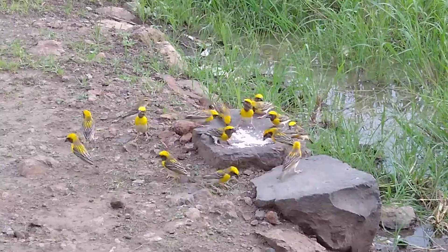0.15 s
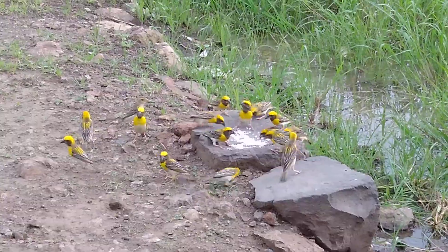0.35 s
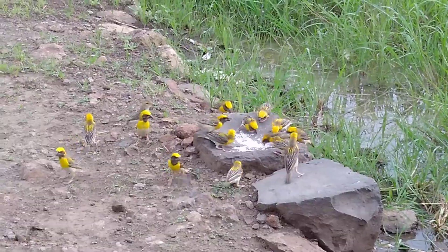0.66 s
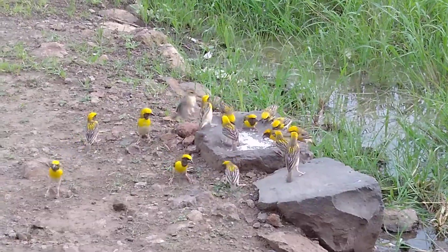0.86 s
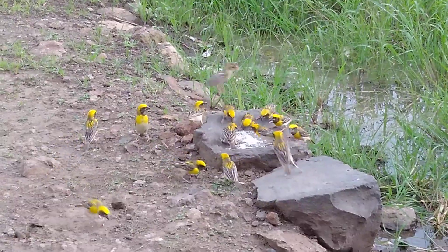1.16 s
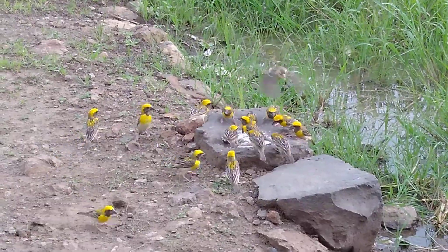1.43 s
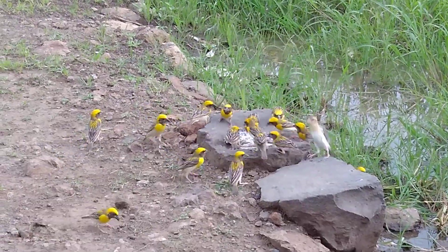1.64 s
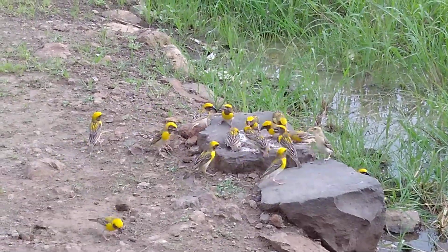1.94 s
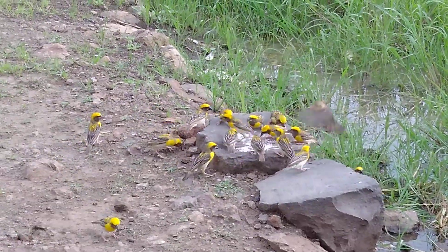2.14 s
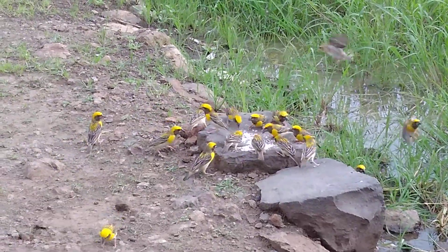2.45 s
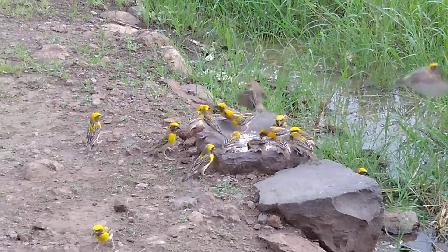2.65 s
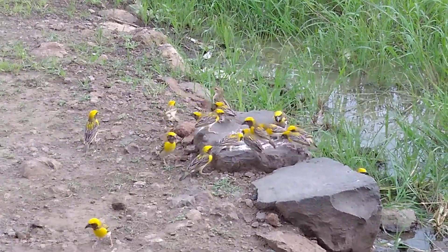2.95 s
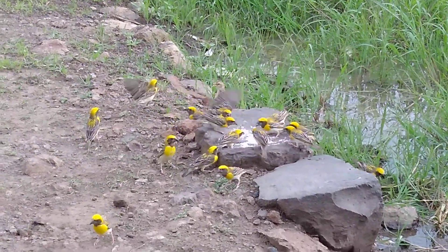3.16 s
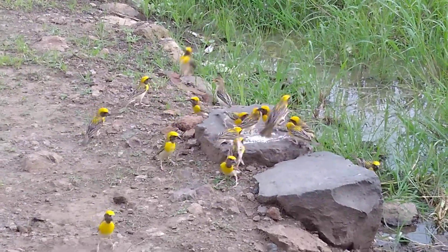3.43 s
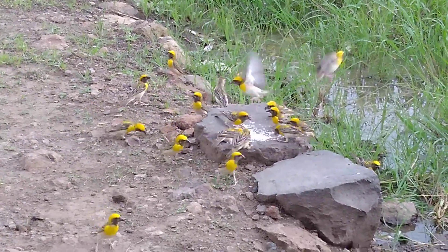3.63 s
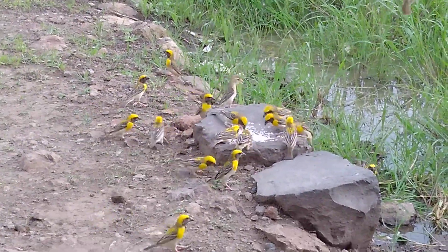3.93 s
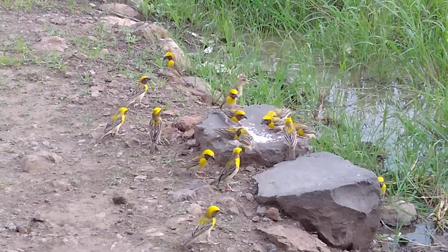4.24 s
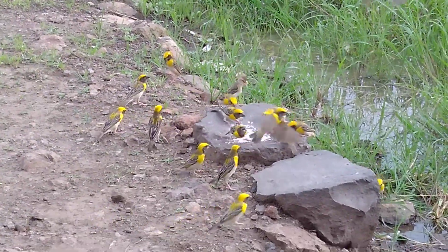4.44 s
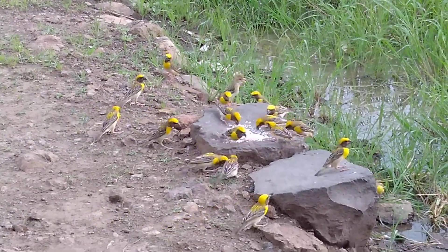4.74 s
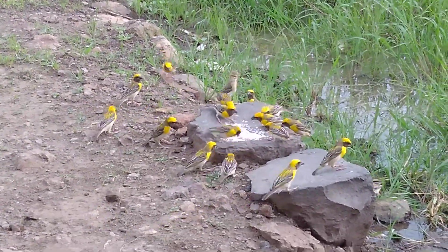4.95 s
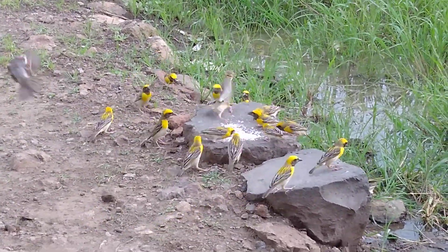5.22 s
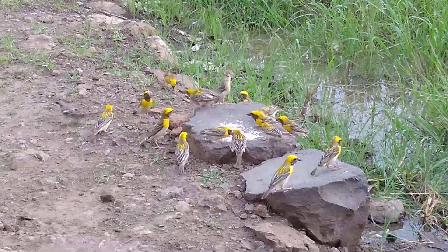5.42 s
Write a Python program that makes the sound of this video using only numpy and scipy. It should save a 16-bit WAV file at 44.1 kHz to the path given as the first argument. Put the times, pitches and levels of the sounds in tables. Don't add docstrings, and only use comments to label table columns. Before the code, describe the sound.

Outdoor flock chatter, close and bright: rapid chirps with a sharp downward opening and a rough, nasal tail, overlapped by small sliding whistles. It starts busy, breaks into short pauses, crowds in the middle, drops to a near lull around five seconds with a faint distant trill, and resumes. Tiny seed cracks tick. Short rocky reflections, low traffic rumble, very faint hum and coos; phone stereo leaning right.

```python
import sys
import numpy as np
from scipy import signal
from scipy.fft import rfft, irfft
from scipy.io import wavfile
from scipy.ndimage import uniform_filter1d

SR = 44100
rng = np.random.default_rng(int(sys.argv[2]) if len(sys.argv) > 2 else 0)


def boost(x):
    u = np.asarray(x, float) / 20
    return 10 ** u


def store_pcm(level_fs):
    pcm = np.round(np.clip(level_fs, -1, 1) * 32767).astype(np.int16)
    wavfile.write(sys.argv[1], SR, np.atleast_2d(pcm).T)


N = 246078
HZ = np.arange(N // 2 + 1) * SR / N

# t/s as the upper voice falls past 4.7 kHz, peak level/dB, held
# voice/dB, sum tone/dB
LAZY_SLIDES = [(0.8724, -31, -30, -4.5), (2.3847, -36, -36, -12), (2.5611, -32.5, -10.5, -12.5),
               (3.2063, -27, -18, -13), (3.3737, -29, -5, -10.5), (3.7907, -25, -8.5, -14),
               (4.8097, -34.5, -1.5, -36.5), (5.3798, -35.5, -7.5, -3), (5.5564, -35, -8, -5.5)]
STEADY_SLIDES = [(.0495, -29, -17, -18.5), (3.694, -25, -8.5, -13.5), (0.222, -31, -5.5, -31),
                 (0.4261, -27, -12, -9.5), (1.1848, -30.5, -5.5, -4), (2.668, -23.5, -10.5, -50),
                 (4.304, -30, -1.5, -9), (4.5786, -30, -3.5, -23)]
BRISK_SLIDES = [(2.1933, -31, -26, -19), (2.8197, -33, -0.5, -20), (3.0113, -30, -7.5, -18),
                (3.1812, -31.5, -4.5, -10), (3.3516, -28.5, -8.5, -9), (3.526, -24.5, -16, -12.5),
                (4.381, -35, 1, -6), (5.216, -30.5, -7, -6.5)]
STEEP_SLIDES = [(1.644, -41, 5, -6.5), (2.2261, -29.5, -2.5, -15), (2.411, -36.5, -2.5, -13),
                (2.6006, -34, -2, -18), (2.683, -36, -10, -2), (4.1383, -33.5, 0, -30),
                (4.3476, -32.5, -5, -40), (4.8246, -32, -9, -28), (5.5353, -38, -3, -11)]
# openings, fall/(Hz/ms), upper voice start f/Hz, held voice f/Hz
SLIDERS = [(LAZY_SLIDES, 76, 5600, 2500), (STEADY_SLIDES, 88, 5150, 2480),
           (BRISK_SLIDES, 120, 5600, 2580), (STEEP_SLIDES, 130, 5450, 2520)]
# t/s, length/s, level/dB, upper voice f/Hz, brightness/dB
ARCHED_RASPS = [(.074, .056, -33.5, 4200, -12), (.238, .066, -35, 3990, -25)]
LEVEL_RASPS = [(0.438, 0.058, -31.5, 4056, -15), (0.671, 0.066, -37, 3974, -4.5),
               (0.879, 0.048, -41.5, 4065, 4), (2.427, 0.083, -37, 3737, -37),
               (2.689, 0.069, -27.5, 4007, -12)]
CLEAR_RASPS = [(2.174, 0.092, -34.5, 4027, -3.5), (2.214, 0.079, -34.5, 3830, -12.5),
               (3.71, 0.093, -32.5, 3973, -30), (3.881, 0.093, -32, 3957, -31),
               (4.147, 0.078, -34.5, 3887, -16), (4.596, 0.08, -32.5, 3884, -5.5)]
BURRED_RASPS = [(1.661, 0.069, -39, 3790, -36), (1.74, 0.038, -43, 4090, -3),
                (2.387, 0.037, -44.5, 3765, -2.5), (2.581, 0.089, -37, 3926, -23),
                (2.83, 0.095, -36, 3850, -22), (3.195, 0.11, -37, 3963, 5), (3.229, 0.064, -34, 4010, -4),
                (3.541, 0.1, -29.5, 4102, -1.5), (3.803, 0.09, -29.5, 4056, -7.5),
                (4.821, 0.059, -39, 3870, 4), (5.23, 0.082, -33.5, 4000, 0), (5.545, 0.15, -37, 4230, 1)]
HARSH_RASPS = [(1.199, 0.085, -34, 3880, -8.5), (1.401, 0.05, -37.5, 3810, 0),
               (2.761, 0.077, -38.5, 3788, -27), (2.903, 0.052, -36.5, 3817, 1.5),
               (3.02, 0.11, -39.5, 3850, -9), (3.375, 0.059, -34.5, 4110, -0.5),
               (3.401, 0.077, -36, 3970, 5.5), (4.312, 0.087, -34, 3920, -7.5),
               (4.385, 0.039, -37.5, 3866, -28), (5.384, 0.058, -42.5, 3980, 6)]
# rasps, roughness 0-1, sinking of the upper voice/Hz, share of the rasp where it is highest
RASPERS = [(ARCHED_RASPS, .12, 750, .43), (LEVEL_RASPS, .18, 80, .3), (CLEAR_RASPS, .26, 260, .3),
           (BURRED_RASPS, .38, 220, .3), (HARSH_RASPS, .53, 250, .3)]
RASP_BEND = [(0, 0.96), (.25, 1.0), (.5, 1.0), (.85, 1), (1, .86)]
# f/Hz, level/dB
BREATH = [(530, -40), (900, -32.5), (1830, -17), (2590, -1), (2950, -2), (3510, -0.5), (3850, -7.5),
          (4970, -9.5), (5850, -11), (6580, -10.5), (7560, -12.5), (9540, -16.5), (14500, -55)]
# from f/Hz, to f/Hz
FLICK_ZONES = [
    (2500, 4900),
    (6200, 8600),
]
# t/s, length/s, level/dB, top f/Hz, second harmonic/dB
GLIDES = [(.298, 0.062, -37.5, 3520, 3.5), (.439, .046, -27, 3485, -15), (.609, 0.058, -33, 3484, 2),
          (1.275, 0.042, -33, 3770, -12), (1.428, 0.055, -36.5, 3696, -9.5),
          (1.685, .085, -38.5, 3596, 0.5), (2.853, 0.061, -33.5, 3593, -0.5), (3.409, .062, -40, 3205, 2)]
# share of its length, height 0-1, level/dB
GLIDE_SHAPE = [(0, 1.0, 7), (.2, .62, 1), (.45, .48, 2), (.68, .4, 0.5), (.88, .26, -2), (1, 0, -3.5)]
# t/s, length/s, level/dB, top f/Hz, end f/Hz
HOOKS = [(.801, 0.07, -34.5, 3740, 2383), (2.097, 0.085, -35, 3446, 2217), (2.317, 0.07, -33.5, 3830, 2150),
         (4.121, .024, -35.5, 2906, 2397), (4.281, 0.056, -34.5, 3590, 2450)]
# share of its length, height 0-1, level/dB
HOOK_SHAPE = [(0, .7, -1), (.07, .97, 0.5), (.17, .99, 3), (.33, 0.8, 2), (0.551, .36, 0.5), (.85, .26, 1),
              (1, .01, -4.5)]
# t/s, length/s, level/dB, from f/Hz, to f/Hz
PURE_CHIRPS = [(1.69, .04, -42, 4300, 2430), (1.817, .008, -34.5, 3100, 2890),
               (1.824, .011, -37, 2930, 1830), (2.497, 0.019, -41, 3700, 2320),
               (.115, 0.035, -37, 2970, 2630), (4.096, 0.016, -50, 3020, 2900),
               (4.144, 0.0082, -32, 2430, 2630)]
NASAL_CHIRPS = [(.205, .013, -44.5, 2590, 2500), (2.148, 0.018, -39, 2760, 2700),
                (3.105, 0.0098, -60, 2980, 2280), (3.281, 0.014, -35.5, 3620, 3120),
                (3.54, .014, -34, 3000, 2600), (3.634, .014, -32, 3710, 2820),
                (3.971, 0.025, -49.5, 2950, 2410), (4.522, 0.029, -43.5, 3690, 2490)]
SQUEALS = [(3.868, .007, -26, 4750, 4500), (3.843, .033, -29, 4100, 3950), (.875, .007, -43, 7700, 8700),
           (.882, .009, -43, 8700, 7800), (.877, .009, -42, 7000, 7600), (.886, .008, -43, 7500, 6900),
           (.095, .03, -47, 8400, 7200), (3.596, .016, -40, 7600, 8600), (3.815, .03, -38, 7500, 7800),
           (2.245, .03, -45, 7800, 7400), (.481, .013, -33, 2450, 1750), (3.212, .01, -36, 8800, 6900),
           (.415, .014, -40, 8000, 7000), (2.935, .02, -39, 7600, 7500)]
# t/s, level/dB, arch top f/Hz, beat/s
TRILLS = [(0.382, -33.5, 2830, 0.0079), (0.563, -29.5, 3100, 0.011), (1.381, -30.5, 3104, 0.01),
          (1.638, -33.5, 3290, .011)]
# f/Hz, level/dB
BEAK = [(2100, 3), (2700, 1), (2950, -1), (3200, -10), (3450, -2), (3800, 1)]
# t/s, beat/s, level/dB, from f/Hz, to f/Hz
FAR_TRILL = (5.012, .0218, -65, 6000, 5250)
# t/s, level/dB, f/Hz
HUSKS = [
    (1.808, -25.5, 7850),
    (2.007, -29, 7180),
    (5.151, -32, 7800),
    (5.501, -38, 7900),
]
# f/Hz, level under the call/dB
FIZZ = [(9500, -33.5), (11000, -38), (12500, -45.5), (13700, -41)]
# f/Hz, time to fall 60 dB/s, level/dB
TAIL = [
    (2000, 0.32, -4.5),
    (5000, 0.31, -9.5),
    (9000, 0.26, -4),
]
# f/Hz, level/dB
PORT = [(150, -37), (900, 2), (1500, -1.5), (2600, -1.5), (4000, 3), (4400, 4), (4700, 6.5), (5050, 0),
        (6200, 0.5), (7500, 5), (8800, -2.5), (10500, -22), (14000, -3)]
# f/Hz, left minus right/dB
SHADOW = [(60, 12), (110, -5), (200, 3), (380, 10.5), (700, 7), (1290, -2.5), (2380, -4.5), (4400, -10.5),
          (8120, -34.5), (15000, -9)]
# f/Hz, angle/rad
LEAD = [(0, 0.5), (1030, -0.5), (1890, -1.4), (2330, -0.8), (3270, -1.2), (4740, -1.5), (5430, -3),
        (6120, 16), (6980, 5.5), (8440, 26), (10800, -19), (13000, -44), (14300, 17), (15200, 9)]
# f/Hz, level/dB
FLOOR = [(15, -50), (30, -35), (79, 1.5), (264, -2.5), (309, -7), (475, -4), (604, -9), (769, -6),
         (833, -7.5), (1060, -9), (1420, -11), (5720, -16.5), (10000, -25.5), (13100, -28.5), (15000, -30)]
# f/Hz, left minus right/dB
FLOOR_TILT = [(60, 29), (110, 9.5), (200, 16), (380, 8.5), (700, -3), (1290, -1), (2380, -1.5), (4400, -3),
              (8120, -18), (15000, 2)]
# f/Hz, width/Hz, level/dB
HUM = [
    (117, 5.3, -98),
    (297.2, 3.8, -78),
]
# t/s, level/dB, f/Hz
BUMPS = [(.45, -62, 200), (1.26, -65, 150), (2.0, -58, 298), (2.14, -58.5, 286.6), (2.985, -53.5, 300),
         (3.763, -62, 200), (3.789, -52.5, 130), (3.79, -54, 420), (3.79, -60, 1300), (3.822, -61, 130)]
# t/s, length/s, level/dB, f/Hz
FAR_COOS = [
    (0.228, 0.23, -66.5, 432),
    (.8, 0.099, -63.5, 905),
    (1.496, 0.24, -75, 1103),
]


def on_hz(table):
    f, value = np.transpose(table)
    return np.interp(np.log(HZ + 1), np.log(f + 1), value)


def unit(x):
    return x / np.sqrt(np.mean(x ** 2, axis=-1, keepdims=True))


def noise(gain, count=1):
    return unit(irfft(rfft(rng.standard_normal((count, N))) * gain, N))


def add(out, s, x, fade=0.00195):
    i, t = int(s * SR), np.arange(len(x)) / SR
    x = x * np.clip(np.minimum(t, t[::-1]) / fade, 0, 1)
    out[i:i + len(x)] += x[:N - i]


def phase(hz):
    return 2 * np.pi * np.cumsum(hz) / SR


def slides():
    out = np.zeros(N)
    flutter = noise(1 / (1 + (HZ / 120) ** 2), count=3)
    breath = noise(boost(on_hz(BREATH)))[0]
    calls = sorted(row + tuple(bird) for rows, *bird in SLIDERS for row in rows)
    for k, (s, db, hold_db, sum_db, fall, top_hz, hold_hz) in enumerate(calls):
        i = int((s - .014) * SR)
        ms = np.arange(-14, 21, 1000 / SR)[:N - i]
        a, b = (flutter[m % 3, i:i + len(ms)] for m in (k, k + 1))
        upper_hz = np.minimum(4700 - fall * ms, top_hz - 15 * (ms + 14))
        upper = phase(uniform_filter1d(upper_hz, size=180) + 30 * a)
        lower = phase(hold_hz + 120 * np.exp(-(ms + 14) / 5.6) - 3.1 * ms + 35 * b)
        beak = boost(np.interp(ms, [-29, -4.5, 1.5, 11.5], [10, -10.5, -0.5, -6]) + 2.9 * a)
        held = boost(hold_db + 2.2 * b)
        both = boost(sum_db + np.interp(ms, [-14, -2, 18], [-5, 0, -12]) + 6.3 * b)
        air_db = np.where(ms <= 6, -18 + 3.5 * (ms + 27) / 41, -9.5)
        air = boost(air_db) * breath[i:i + len(ms)]
        call = beak * np.sin(upper) + held * np.sin(lower) + both * np.sin(upper + lower) + air
        add(out, i / SR, boost(db) * call, fade=0.0068)
    return out


def flicks(length, bright_db):
    flick_s, every_s, fall_hz = 0.0067, .0055, 750
    out, u = np.zeros(int(length * SR) + 1), np.linspace(0, 1, int(flick_s * SR))
    for k, (where, late, size) in enumerate(rng.uniform(size=(40, 3))):
        octave = k % 2
        s, (lo, hi) = (k + late) * every_s, FLICK_ZONES[octave]
        if s < length - flick_s - 1 / SR:
            db = -5.5 - 8 * size + octave * (bright_db + 7)
            hz = lo + (hi - lo) * where + (1 + octave) * fall_hz * (.5 - u)
            add(out, s, boost(db) * np.sin(phase(hz)), fade=0.0027)
    return out


def rasps():
    out = np.zeros(N)
    shake = noise(np.exp(-((HZ - 98) / 22) ** 2), count=4)
    flutter = noise(1 / (1 + (HZ / 110) ** 2), count=4)
    breath = noise(boost(on_hz(BREATH)), count=4)
    calls = sorted(row + tuple(bird) for rows, *bird in RASPERS for row in rows)
    for k, (s, length, db, up_hz, bright_db, rough, sag_hz, top) in enumerate(calls):
        pushed_hz = up_hz - 3836
        low_hz, low_db = 2980 + 0.299 * pushed_hz, -4 - 21.5 * pushed_hz / 1e3
        i = int(s * SR)
        u = np.linspace(0, 1, int(length * SR))[:N - i]
        a, b, c = ((m % 4, slice(i, i + len(u))) for m in (k, k + 1, k + 2))
        sag = sag_hz * ((u - top) / (1 - top)) ** 2
        upper = phase(up_hz - sag + (10 + 300 * rough) * shake[a])
        lower = phase(low_hz * np.interp(u, *np.transpose(RASP_BEND)) + (20 + 300 * rough) * shake[b])
        high = boost((0.5 + 2.9 * rough) * flutter[a])
        low = boost(low_db + 1.5 + (3.5 + 2.35 * rough) * flutter[b])
        octave = boost(-6 + np.clip(6.6 * flutter[c], -9, 4)) * high * np.sin(2 * upper + 1.1 * flutter[a])
        products = octave + low * np.sin(upper + lower) + boost(-3.5) * low * np.sin(2 * lower)
        swell = np.clip(np.minimum(u, 1 - u) / 0.13, 0, 1) ** 0.55
        hiss = boost(-12.5 + 16.3 * rough + flutter[b] + 3.1 * shake[a]) * swell * breath[a]
        ring = boost(-23) * flutter[c] * np.sin(phase(np.full(len(u), float(up_hz))))
        call = high * np.sin(upper) + low * np.sin(lower) + boost(bright_db) * swell * products
        call = call + hiss + ring + np.sqrt(2 * rough) * flicks(length, bright_db)[:len(u)]
        add(out, s, boost(db) * call, fade=0.0022)
    return out


def whistle(hz, second_db, third_db=-30, waver_db=1.5):
    slow = uniform_filter1d(rng.standard_normal((2, len(hz))), size=110)
    a, b = uniform_filter1d(slow, size=110) * 13
    p, beak = phase(hz + 25 * b), boost(np.interp(hz, *np.transpose(BEAK)))
    second = boost(second_db + waver_db * b) * beak * np.sin(2 * p)
    return boost(waver_db * a) * np.sin(p) + second + boost(third_db) * np.sin(3 * p)


def bent_whistle(shape, length, db, top_hz, end_hz, second_db, third_db, waver_db):
    share, height, shape_db = np.transpose(shape)
    u = np.linspace(0, 1, int(length * SR))
    hz = end_hz + (top_hz - end_hz) * uniform_filter1d(np.interp(u, share, height), size=120)
    return boost(db + np.interp(u, share, shape_db)) * whistle(hz, second_db, third_db, waver_db)


def whistles():
    out = np.zeros(N)
    for s, length, db, top_hz, second_db in GLIDES:
        add(out, s, bent_whistle(GLIDE_SHAPE, length, db, top_hz, 2122, second_db, -22, 2.5))
    for s, length, db, top_hz, end_hz in HOOKS:
        add(out, s, bent_whistle(HOOK_SHAPE, length, db, top_hz, end_hz, -13.5, -24, 0.73))
    for chirps, second_db in (PURE_CHIRPS, -27), (NASAL_CHIRPS, 6), (SQUEALS, -40):
        for s, length, db, from_hz, to_hz in chirps:
            hz = np.linspace(from_hz, to_hz, int(length * SR))
            add(out, s, boost(db) * whistle(hz, second_db), fade=0.00094)
    return out


def trills():
    out = np.zeros(N)
    for s, db, top_hz, beat in TRILLS:
        u = np.linspace(-1, 1, int(0.017 * SR))
        arch_hz = top_hz - 1050 * np.abs(u) ** 1.15
        add(out, s, boost(db - 3) * whistle(arch_hz, second_db=-5, third_db=-28, waver_db=2.2))
        drop_hz = np.linspace(4500, 3300, int(.011 * SR))
        add(out, s + .012, boost(db) * whistle(drop_hz, second_db=-22))
        for k in range(3):
            u = np.linspace(0, 1, int(0.0081 * SR))
            flick = whistle(2150 + 550 * u, second_db=-17)
            flick = flick + boost(0.5) * whistle(4100 - 500 * u, second_db=-15)
            add(out, s + .019 + k * beat, boost(db) * flick, fade=0.00175)
    return out


def husks():
    out, t = np.zeros(N), np.arange(200) / SR
    for s, db, hz in HUSKS:
        ring = np.sin(2 * np.pi * hz * t) * np.exp(-t * hz / 2.5)
        octave_below = np.sin(np.pi * hz * t) * np.exp(-t * hz / 2.2)
        add(out, s, boost(db) * (ring + boost(-2) * octave_below), fade=0.00015)
    return out


def snaps():
    out, t = np.zeros(N), np.arange(60) / SR
    for s, db, hz in HUSKS:
        fall = np.sin(phase(np.linspace(15000, 11500, 60)))
        add(out, s, boost(db - 21) * fall * np.exp(-t / .0005), fade=.0001)
    return out


def knocks(table, cycles):
    out, grain = np.zeros(N), rng.standard_normal((len(table), 2000))
    t = np.arange(2000) / SR
    for (s, db, hz), g in zip(table, grain):
        sos = signal.butter(1, [.45 * hz, 1.9 * hz], "band", fs=SR, output="sos")
        add(out, s, boost(db) * unit(signal.sosfilt(sos, g)) * np.exp(-t * hz / cycles), fade=0.00041)
    return out


def fizz(birds):
    strength = np.sqrt(uniform_filter1d(birds ** 2, size=200))
    patches = noise(1 / (1 + (HZ / 9) ** 2), count=4)
    return sum(boost(db + 4.54 * patch) * strength * noise(np.exp(-((HZ - hz) / 800) ** 2), count=2)
               for (hz, db), patch in zip(FIZZ, patches))


def far_trill():
    out = np.zeros(N)
    s, beat, db, from_hz, to_hz = FAR_TRILL
    tick = boost(db) * np.sin(phase(np.linspace(from_hz, to_hz, int(.011 * SR))))
    for k in range(6):
        add(out, s + k * beat, tick, fade=.003)
    return out


def surroundings(x):
    t = np.arange(int(.5 * SR)) / SR

    def decay(t60):
        return np.exp(-np.log(1000) * t / t60) * np.sqrt(14 / t60 / SR)

    tail = boost(-12.5) * rng.standard_normal((2, len(t))) * decay(0.059)
    for (hz, t60, db), edge in zip(TAIL, [(200, 3500), (3500, 6500), (6500, 15000)]):
        sos = signal.butter(2, edge, "band", fs=SR, output="sos")
        tail = tail + boost(db) * signal.sosfilt(sos, rng.standard_normal((2, len(t)))) * decay(t60)
    return signal.fftconvolve(x[None], tail * np.clip(t / 0.0041, 0, 1), axes=1)[:, :N]


def background():
    white = rfft(rng.standard_normal((3, N)))
    shared = 0.53 / (1 + (HZ / 800) ** 2)
    pair = np.sqrt(shared) * white[0] + np.sqrt(1 - shared) * white[1:]
    tilt = boost(on_hz(FLOOR_TILT))
    mid = np.sqrt((1 + tilt ** 2 + 2 * shared * tilt) / 4)
    air = irfft(pair * boost(on_hz(FLOOR)) * np.array([tilt, np.ones_like(tilt)]) / mid, N)
    air *= boost(-65.5) / np.std(air.mean(axis=0))
    hum = sum(boost(db) * noise(1 / (1 + ((HZ - hz) / width) ** 2))[0] for hz, width, db in HUM)
    low = knocks(BUMPS, cycles=2.2) + hum
    coos = np.zeros(N)
    for s, length, db, hz in FAR_COOS:
        steady_hz = np.full(int(length * SR), float(hz))
        add(coos, s, boost(db) * np.sin(phase(steady_hz)), fade=0.062)
    return air + low * boost(np.array([[4], [-8]])) + coos


def scene():
    birds = husks() + boost(-10.5) * knocks(HUSKS, cycles=14)
    birds = birds + slides() + rasps() + whistles() + trills() + far_trill()
    birds = irfft(rfft(birds) * boost(on_hz(PORT)), N)
    wet = surroundings(birds)
    right = birds + wet[1]
    lead = np.interp(HZ, *np.transpose(LEAD))
    left = rfft(birds) * np.exp(1j * lead) + boost(3.5) * rfft(wet[0])
    left = irfft(left * boost(on_hz(SHADOW)), N)
    both = np.array([left, right]) + fizz(right) * boost(np.array([[-6], [0]])) + background()
    dull = signal.sosfilt(signal.ellip(8, .2, 70, 14150, fs=SR, output="sos"), both)
    return dull + snaps() * boost(np.array([[-1.5], [1.5]]))


def low_pass(x):
    return signal.sosfilt(signal.butter(12, 15610, fs=SR, output="sos"), x)


def record(dry):
    return low_pass(dry)


dry = scene()
out = record(dry)
store_pcm(out)
```